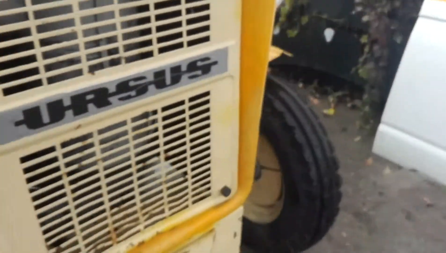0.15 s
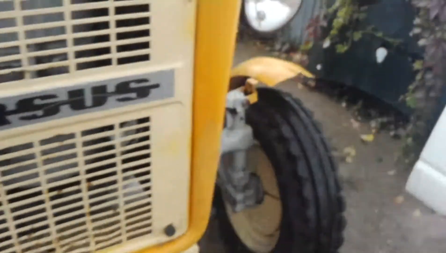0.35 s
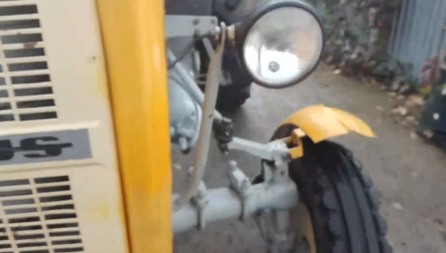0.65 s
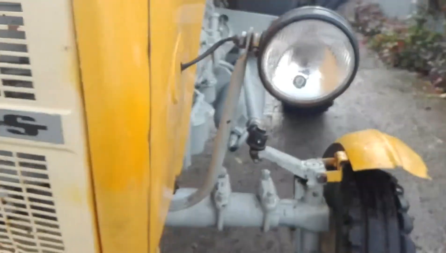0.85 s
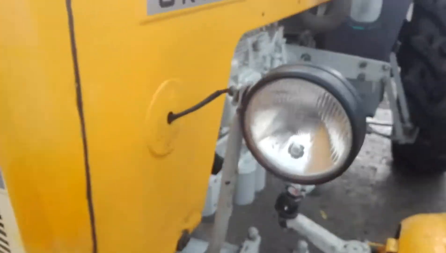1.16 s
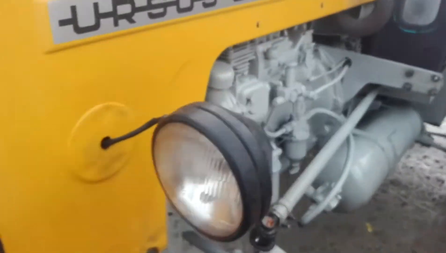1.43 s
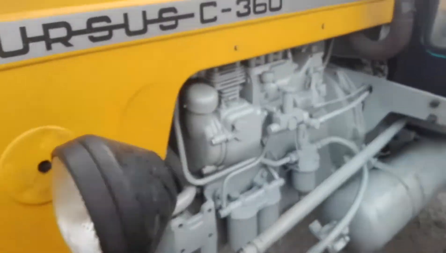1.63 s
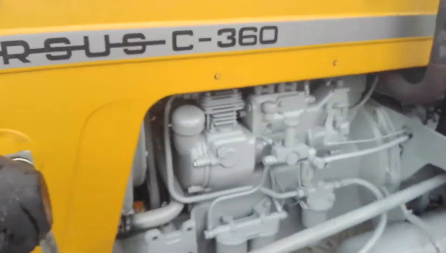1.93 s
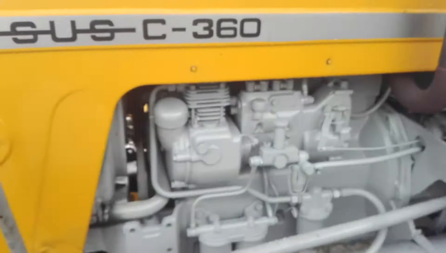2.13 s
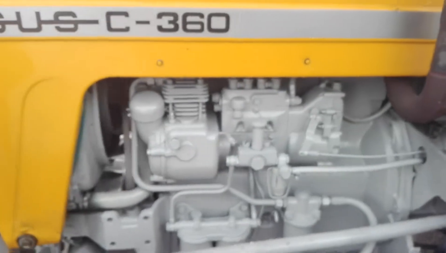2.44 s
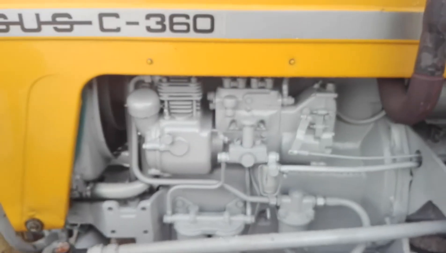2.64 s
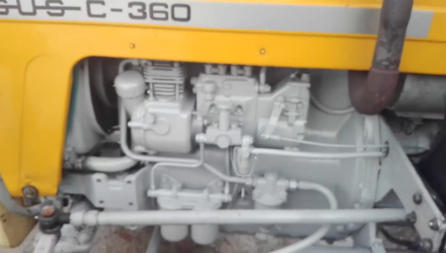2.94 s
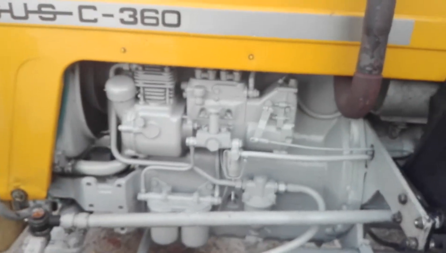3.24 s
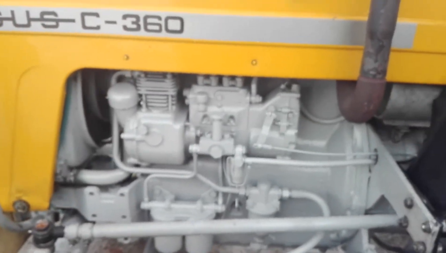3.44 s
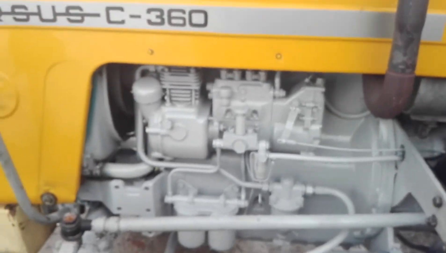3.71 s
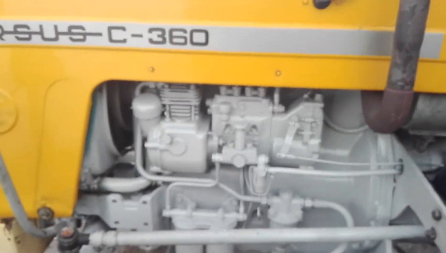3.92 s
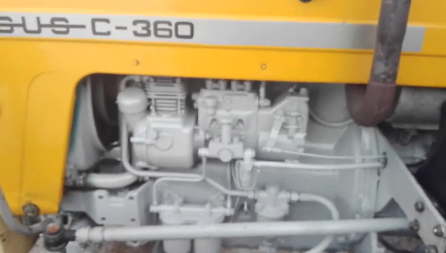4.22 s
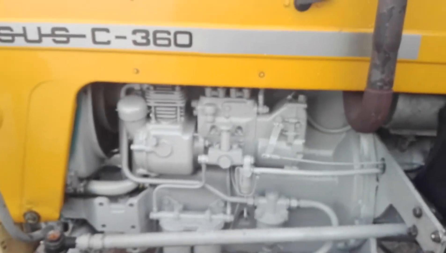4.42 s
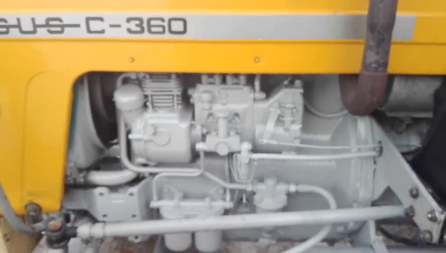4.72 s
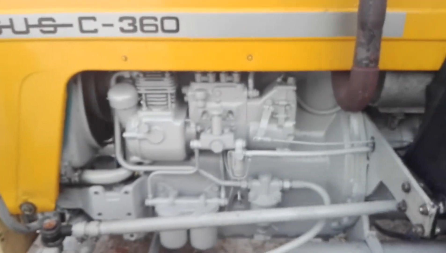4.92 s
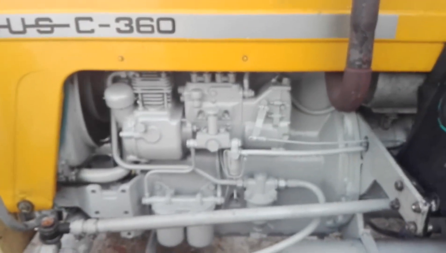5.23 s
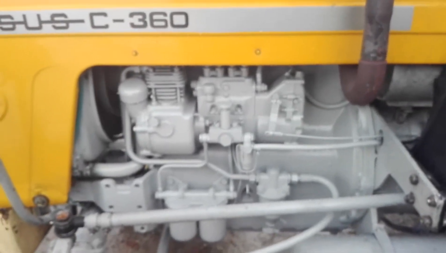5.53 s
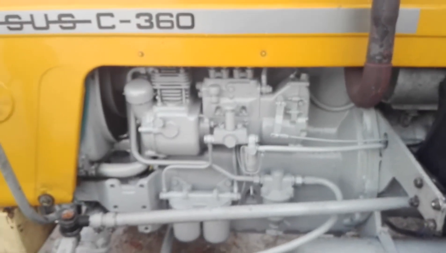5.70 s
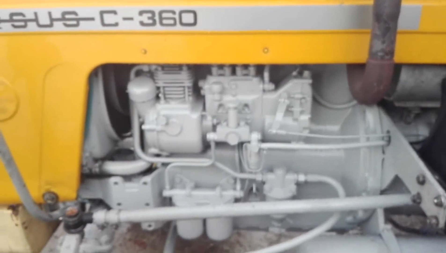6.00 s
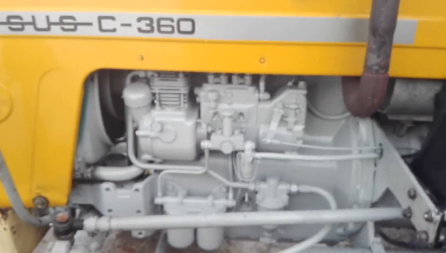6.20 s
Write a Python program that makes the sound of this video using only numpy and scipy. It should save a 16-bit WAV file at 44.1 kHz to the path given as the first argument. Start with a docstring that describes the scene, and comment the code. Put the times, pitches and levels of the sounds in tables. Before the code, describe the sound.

A four-cylinder tractor diesel is already idling at 0 s, close to the microphone in an open yard. About 27 firings a second blend into a low drone with rapid knocking, and unequal cylinders give a loping beat. At first the knock is boxy, heard through the grille. From about 1 to 2.75 s the microphone moves round to the side, and the metallic clatter, valve rattle and thin injector ticks become clearer and harder, with a soft intake gulp every cycle. The idle holds steady until 5.35 s. Then the throttle is blipped: a sudden loud bark and harsher, more even knocking, with a second push at about 5.7 s driving the pitch rapidly upward to a peak near 6 s, with a faint fan hum. Fuel cuts, the knocking drops sharply, and a smoother whirring engine coasts slowly downward until the end, around 6.4 s.

```python
"""Tractor diesel idling in a yard, then revved

The microphone moves from the grille of a four-cylinder tractor diesel round to its side.
Every firing thumps the pipe with low tones and knocks the block with bursts of coloured, ringing noise;
unequal cylinders give a low, loping beat. Near the end the throttle is blipped in two quick surges,
then the fuel cuts and the engine coasts smoothly."""
import sys
import numpy as np
from scipy import signal
from scipy.fft import rfft, irfft, next_fast_len
from scipy.io import wavfile
from scipy.ndimage import uniform_filter1d

SR = 44100
rng = np.random.default_rng(int(sys.argv[2]) if len(sys.argv) > 2 else 0)


def wav_record(signal):
    """Record a signal, one row per channel, as 16-bit PCM in the file named by sys.argv[1]."""
    frames = np.transpose(np.atleast_2d(signal))
    bounded = np.clip(frames, -1, 1)
    # unit amplitude maps onto the largest positive 16-bit level
    quanta = np.round(bounded * 32767).astype(np.int16)
    wavfile.write(sys.argv[1], SR, quanta)


N = 280476
TIME = np.arange(N) / SR  # seconds
TOP_HZ = 14400  # band limit of the recorder

# Microphone position. Each row: time in seconds, place from 0 (at the grille) to 1 (beside the block).
MIC_PLACE = [(.9, 0.054), (1.9, 0.48), (2.75, 1)]
# Cylinders in firing order, as uneven as they can be; evenness scales these down.
# Each row: boom in dB, knock in dB, clatter in dB, tick in dB.
CYLINDER_STRENGTHS = [(-11, -4, 3, 5), (-8.5, -1, 5, 3), (-1, -5, 0, -0.5), (-3.5, -4.5, 3, 4)]
# Engine speed. Each row: time in seconds, firings per second.
ENGINE_SPEED = [(0, 26.72), (1.7, 27.144), (2.7, 26.826), (5.36, 27.09), (5.53, 31.03), (5.63, 35.69),
                (5.72, 37.9), (6.0, 49.03), (6.37, 41.53)]
# Blips of the throttle. Each row: opens in seconds, shuts in seconds, fuel from 0 to 1.
THROTTLE_BLIPS = [(5.351, 5.698, 0.81), (5.674, 5.966, 0.93)]
# Each blip bites at once with a share of its fuel, swells to all of it and shuts quickly.
BITE_S, BITE_SHARE, SWELL_S, SHUT_S = 0.027, 0.47, 0.26, 0.056


def exhaust():
    """The pipe's loping idle drone becomes a hard bark at the first blip; bonnet boom and intake chug join it."""
    # Drone heard at the grille. Each row: multiple of the four-stroke cycle rate, level in dB.
    grille_orders = [(1, -48), (3, -46.5), (4, -21.5), (5, -37), (6, -33), (7, -33.5), (8, -15.5), (9, -38),
                     (10, -46), (11, -35.5), (12, -28.5), (13, -46.5), (14, -53), (22, -47), (24, -28.5),
                     (25, -58), (31, -53), (34, -40), (35, -51.5)]
    # Drone heard beside the block. Each row: multiple of the four-stroke cycle rate, level in dB.
    side_orders = [(1, -43), (3, -39), (4, -61), (5, -49.5), (6, -21), (7, -31), (8, -24), (9, -47.5),
                   (10, -27.5), (11, -42), (12, -26.5), (13, -24), (14, -32), (16, -49), (19, -37.5),
                   (20, -55), (21, -35)]
    # Resonances of the pipe under load. Each row: centre in Hz, width in Hz, level in dB.
    pipe_modes = [(41.6, 38, 11.5), (97, 83, -7.5), (255, 60, -17.5), (138, 27, -5.5)]
    # Resonances of silencer and bonnet. Each row: centre in Hz, width in Hz, level in dB.
    bonnet_modes = [(120.4, 8.4, 0.5), (144.4, 16.2, 0.5), (169.3, 18.6, -0.5), (198, 29.4, -6),
                    (238.7, 27, -9.5), (322, 17, -13.5)]
    # Air through the radiator. Each row: frequency in Hz, level in dB per Hz.
    draught = [(100, -43), (200, -1), (310, -2), (430, -9.5), (560, -11.5), (900, -43.5)]
    # Thrum level: idling at the grille, idling beside the block, at full fuel, starting to coast, all in dB.
    thrum_states = (-16.5, -19.5, -10.5, -33)
    # Boom level in dB, in the same four states.
    boom_states = (-32.5, -29.5, -19, -29.5)
    thrum_return = 13  # dB per second: the exhaust picks up again as the coasting engine slows

    cylinder_db = np.transpose(CYLINDER_STRENGTHS)[0]
    even, place = evenness(), track(MIC_PLACE)

    grille_drone = drone(grille_orders, lag=0.018)
    side_drone = drone(side_orders, lag=0.078)
    idle = blend(grille_drone, side_drone, place)
    pipe_puffs = puffs(cylinder_db, scatter_db=3.0, jitter=0.0009)
    bark = -band(resonate(pipe_puffs, pipe_modes), 32.6, 204)
    thrum = steady(blend(idle, steady(bark), even))

    bonnet_puffs = puffs(cylinder_db, scatter_db=4.0, jitter=0.0001)
    boom = steady(band(resonate(bonnet_puffs, bonnet_modes), 116.5, 287))
    # the gulps stand out beside the block at idle
    boom = blend(boom, chug(), 0.5 * place * (1 - even))
    air = steady(coloured(rng.standard_normal(N), draught))
    boom = steady(blend(boom, air, 0.12))

    coasted_s = np.maximum(TIME - THROTTLE_BLIPS[-1][1], 0)
    thrum_db = by_state(thrum_states, shade=0.13) + thrum_return * coasted_s
    return amp(thrum_db) * thrum + amp(by_state(boom_states, shade=0.3)) * boom


def drone(orders, lag, size=512):
    """Clean low orders locked to the crank; the beat starts lag firings into each cycle."""
    order, db = np.transpose(orders)
    multiples = np.arange(size // 2 + 1)
    order_db = np.interp(multiples, np.round(order), db)
    order_db = order_db - 8.3 * np.maximum(multiples - order[-1], 0)  # falls away above the last order
    cycle = irfft(causal(amp(order_db)))
    turn = (crank() - lag) / len(CYLINDER_STRENGTHS)
    return steady(np.interp(turn, np.arange(size) / size, cycle, period=1))


def chug(centre=2.05, length=0.66, start_hz=232, end_hz=150):
    """Once a cycle the air intake gulps: a swelling tone that falls in pitch (centre and length in firings)."""
    turn = crank() % len(CYLINDER_STRENGTHS) - centre
    rate = track(ENGINE_SPEED).mean()
    fall = (end_hz - start_hz) / (4 * length)
    cycles = ((start_hz + end_hz) / 2 * turn + fall * turn ** 2 / 2) / rate
    swell = np.exp(-(turn / length) ** 2 / 2)
    return steady(swell * np.sin(2 * np.pi * cycles))


def combustion():
    """Diesel knock rings the block, heard through the grille, then in the open; its colour shifts at the blips."""
    # Knock through the grille. Each row: frequency in Hz, level in dB per Hz.
    front_colour = [(160, -29.5), (280, -1.5), (324, 5), (428, -13.5), (544, -9), (641, -5), (934, -10.5),
                    (1010, -3.5), (1370, -11.5), (1680, -11.5), (1870, -8.5), (2800, -10.5), (3640, -21),
                    (6160, -120)]
    # Knock in the open beside the block. Each row: frequency in Hz, level in dB per Hz.
    block_colour = [(310, -40.5), (520, -8.5), (774, 0.5), (850, -1.5), (1210, 4.5), (1560, 2.5),
                    (1680, -4), (1830, 4), (2040, -2), (2410, -15), (2600, -27), (3380, -34), (5720, -120)]
    # Knock from the first blip on. Each row: frequency in Hz, level in dB per Hz.
    loaded_colour = [(310, -35.5), (520, -34), (595, -17.5), (728, -3), (916, -12), (1050, -4), (1140, -6),
                     (1210, -6), (1310, -5), (1570, 0), (2010, -8), (2140, -11.5), (2600, -30), (3380, -24),
                     (5720, -120)]
    # Ringing of the block. Each row: centre in Hz, width in Hz, level in dB.
    block_modes = [(758, 100, -3.5), (1107, 17, 8.5), (1241, 24, 1.5), (1553, 29, 2.5), (1792, 81, -0.5),
                   (2040, 69, -1)]
    # Knock level: idling at the grille, idling beside the block, at full fuel, coasting, all in dB.
    knock_states = (-30, -27.5, -15, -31.5)
    hits = blows(np.transpose(CYLINDER_STRENGTHS)[1], lead=0.0004, rise=0.0012, t60=0.14, alike=0.72,
                 scatter_db=0.44, crack=0.44, crack_t60=0.0051, rattle=0.019, whirr=0.96)
    front = steady(coloured(hits, front_colour))
    beside = steady(coloured(hits, block_colour))
    idle = steady(blend(front, beside, track(MIC_PLACE)))
    loaded = steady(coloured(hits, loaded_colour))
    body = steady(blend(idle, loaded, evenness()))
    return amp(by_state(knock_states, shade=10.5)) * with_ring(body, hits, block_modes, 0.072)


def valve_gear():
    """Tappets and rockers clatter with each firing and ping their cover."""
    # Clatter of the valves. Each row: frequency in Hz, level in dB per Hz.
    valve_colour = [(1290, -13), (2200, -6), (2510, -4.5), (4230, 0), (6020, -8.5), (7000, -23),
                    (9100, -34), (15400, -120)]
    # Ringing of the rocker cover. Each row: centre in Hz, width in Hz, level in dB.
    cover_modes = [(3270, 50, 16), (4090, 55, -10), (4650, 68, 2), (4900, 160, 10), (5750, 28, -9)]
    # Clatter level: idling at the grille, idling beside the block, at full fuel, coasting, all in dB.
    clatter_states = (-36.5, -32.5, -22.5, -36.5)
    hits = blows(np.transpose(CYLINDER_STRENGTHS)[2], lead=0.0017, rise=0.0041, t60=0.099, alike=0.45,
                 scatter_db=1.1, crack=0.18, crack_t60=0.04, rattle=0.028, whirr=0.84)
    body = steady(coloured(hits, valve_colour))
    return amp(by_state(clatter_states, shade=1.7)) * with_ring(body, hits, cover_modes, 0.024)


def injection():
    """Pump and injector needles tick just ahead of the knock and ring the fuel lines."""
    # Tick of the injectors. Each row: frequency in Hz, level in dB per Hz.
    injector_colour = [(3650, -16.5), (6200, -8), (6800, -3), (8630, -7), (10200, -12), (12400, -13.5),
                       (13700, -13.5), (14500, -29)]
    # Ringing of the fuel lines. Each row: centre in Hz, width in Hz, level in dB.
    line_modes = [(6430, 25, 4), (8700, 56, 8), (9500, 83, 6.5), (10500, 120, 4), (11990, 100, -7)]
    # Tick level: idling at the grille, idling beside the block, at full fuel, coasting, all in dB.
    tick_states = (-48, -45, -31, -48)
    hits = blows(np.transpose(CYLINDER_STRENGTHS)[3], lead=0.005, rise=0.012, t60=0.081, alike=0.68,
                 scatter_db=3.6, crack=0.52, crack_t60=0.0045, rattle=0.02, whirr=1.0)
    body = steady(coloured(hits, injector_colour))
    return amp(by_state(tick_states, shade=1.4)) * with_ring(body, hits, line_modes, 0.088)


def loose_tappet(index=2, lag=0.0023, t60=0.025, low_hz=5200, high_hz=9500):
    """One cylinder's loose tappet adds a short bright click to every cycle, lag seconds after firing."""
    # Click level: idling at the grille, idling beside the block, at full fuel, coasting, all in dB.
    tappet_states = (-45, -46, -31, -66)
    no_bias = np.zeros(len(CYLINDER_STRENGTHS))
    at, cylinder, strength = firings(no_bias, scatter_db=3.5, jitter=0.0006)
    strikes = np.bincount(at + int(lag * SR), strength * (cylinder == index), N)[:N]
    decay = amp(-60 * TIME[:SR // 10] / t60)
    envelope = signal.fftconvolve(strikes, decay)[:N]
    click = steady(band(rng.standard_normal((2, N)), low_hz, high_hz))
    return amp(by_state(tappet_states)) * envelope * click


def top_hum(multiple=4.1, top_db=-28.5, db_per_octave=50):
    """The engine hums at a fixed multiple of the firing rate, heard only near top speed."""
    speed = track(ENGINE_SPEED)
    level_db = top_db + db_per_octave * np.log2(speed / speed.max())
    return amp(level_db) * np.sqrt(2) * np.sin(2 * np.pi * multiple * crank())


def blows(cylinder_db, lead, rise, t60, alike, scatter_db, crack, crack_t60, rattle, whirr, count=4):
    """Mid and side noise of metal struck once per firing, over the even whirr of gears and fan (times in s)."""
    # Share of the noise in blows: idling at the grille, idling beside the block, at full fuel, coasting (0-1).
    blow_share = (0.69, 0.81, 1, 0.41)
    t = np.arange(5400) / SR
    even, share = evenness(), by_state(blow_share)
    cylinders = len(CYLINDER_STRENGTHS)
    # each cylinder shakes the block in its own way, much the same every time
    own = rng.standard_normal((cylinders, 2, len(t)))
    # loose parts strike again at nearly fixed delays after the blow
    delays = rng.uniform(0.77, 1, (cylinders, count)) * np.linspace(0.2, 1, count) * rattle
    out = np.zeros((2, N + SR))
    for at, cylinder, strength in zip(*firings(cylinder_db, scatter_db, jitter=0.0003)):
        haste = 1 + 0.48 * even[at]  # from the first blip on: a shorter blow with a faster rise
        shape = (1 - np.exp(-haste * t / rise)) * amp(-60 * haste * t / t60)
        strike_delays = delays[cylinder] + rng.uniform(0, 0.002, count)
        for delay, db in zip(strike_delays, rng.normal(0, 3.2, count)):
            crack_gain = crack * amp(db - 60 * delay / t60)
            shape = shape + crack_gain * (t > delay) * amp(-60 * np.abs(t - delay) / crack_t60)
        fresh = rng.standard_normal((2, len(t)))
        grain = tinted(blend(fresh, own[cylinder], alike), depth_db=2.4)
        start = max(at - int(lead * SR), 0)
        out[:, start:][:, :len(t)] += strength * shape * grain
    even_noise = rng.standard_normal((2, N))
    return blend(even_noise, steady(out[:, :N]), 1 - whirr * (1 - share))


def tinted(x, depth_db, count=28):
    """x with a new random colour, as no two blows land alike."""
    hz = np.fft.rfftfreq(x.shape[-1], 1 / SR)
    points = np.column_stack([np.geomspace(500, TOP_HZ, count), depth_db * rng.standard_normal(count)])
    return irfft(rfft(x) * along(points, hz), x.shape[-1])


def with_ring(body, hits, modes, share):
    """Adds a share of ringing metal to the body of a sound."""
    # mid and side change places, so the ring has its own noise
    ring = steady(resonate(hits[::-1], modes))
    return steady(blend(body, ring, share))


def firings(cylinder_db, scatter_db, jitter):
    """Sample, cylinder and strength of each firing, with timing jitter in seconds; evenness levels the cylinders."""
    turns = crank()
    n = np.arange(int(turns[-1]) + 1)
    chance = rng.standard_normal((len(n), 2))
    fired_s = np.interp(n, turns, TIME) + jitter * chance[:, 0]
    at = np.clip(fired_s * SR, 0, N - 1).astype(int)
    cylinder = n % len(CYLINDER_STRENGTHS)
    uneven = 1 - evenness()[at]
    return at, cylinder, amp(uneven * cylinder_db[cylinder] + scatter_db * chance[:, 1])


def puffs(cylinder_db, scatter_db, jitter):
    """One pressure pulse per firing."""
    at, _, strength = firings(cylinder_db, scatter_db, jitter)
    return np.bincount(at, strength, N)


def crank(first_firing_s=0.023):
    """Crank progress, counted in firings: the running sum of engine speed."""
    turns = np.cumsum(track(ENGINE_SPEED)) / SR
    return turns - turns[int(first_firing_s * SR)]


def fuel():
    """Fuel above idle, 0 to 1: every blip bites, swells and shuts."""
    pushes = []
    for opens, shuts, amount in THROTTLE_BLIPS:
        swell = BITE_SHARE + (1 - BITE_SHARE) * ramp(opens, SWELL_S)
        pushes.append(amount * ramp(opens, BITE_S) * swell * (1 - ramp(shuts, SHUT_S)))
    return np.max(pushes, axis=0)


def evenness(idle=0.19):
    """How alike the cylinders fire (0-1): from the first blip on, the engine stops loping and all work alike."""
    return idle + (1 - idle) * ramp(THROTTLE_BLIPS[0][0], BITE_S)


def by_state(values, shade=1):
    """Moves between grille, side, full-fuel and coasting values; more shade brings a part into the open later."""
    grille, side, loaded, coast = values
    in_view = track(MIC_PLACE) ** shade
    coasting = ramp(THROTTLE_BLIPS[-1][1], SHUT_S)
    return grille + (side - grille) * in_view + (loaded - side) * fuel() + (coast - side) * coasting


def ramp(start, length):
    """Rises from 0 to 1 over length seconds."""
    return np.clip((TIME - start) / length, 0, 1)


def track(rows):
    """One value per sample from (seconds, value) rows."""
    seconds, values = np.transpose(rows)
    return np.interp(TIME, seconds, values)


def amp(db):
    """Decibels to gain."""
    return 10 ** (np.asarray(db) / 20)


def steady(x):
    """x levelled to about rms 1 over an idling engine cycle, keeping the beats within it; mid sets the gain."""
    size = int(0.148 * SR)
    mid_power = np.atleast_2d(x)[0] ** 2
    power = uniform_filter1d(uniform_filter1d(mid_power, size), size // 2)
    return x / np.sqrt(np.abs(power) + 1e-12)


def blend(a, b, share):
    """Equal-power fade from a to b."""
    share = np.clip(share, 0, 1)
    return np.sqrt(1 - share) * a + np.sqrt(share) * b


def along(points, hz):
    """Gain of (Hz, dB) points on a log axis."""
    f, db = np.transpose(points)
    return amp(np.interp(np.log(hz + 1), np.log(f + 1), db))


def causal(gain):
    """The minimum-phase response that has these gains, by folding the cepstrum."""
    cepstrum = irfft(np.log(np.maximum(gain, 1e-6)))
    half = len(cepstrum) // 2
    cepstrum[1:half] *= 2
    cepstrum[half + 1:] = 0
    return np.exp(rfft(cepstrum))


def filtered(x, response):
    """x times a response of frequency, padded so that tails do not wrap."""
    m = 2 * next_fast_len(N // 2 + 8192)
    return irfft(rfft(x, m) * response(np.fft.rfftfreq(m, 1 / SR)), m)[..., :N]


def coloured(x, spectrum):
    """x through a causal body with this spectrum."""
    return filtered(x, lambda hz: causal(along(spectrum, hz)))


def resonate(x, modes):
    """x through a few parallel resonances of alternating sign."""
    def response(f):
        total = 0
        for k, (centre, width, db) in enumerate(modes):
            total = total + (-1) ** k * amp(db) * 1j * f * width / (centre * centre - f * f + 1j * f * width)
        return total
    return filtered(x, response)


def band(x, low_hz, high_hz, order=2):
    """Causal band-pass."""
    return signal.sosfilt(signal.butter(order, [low_hz, high_hz], "band", fs=SR, output="sos"), x)


def scene():
    """The whole engine in stereo; the channels differ almost only in the treble."""
    # Stereo width. Each row: frequency in Hz, side to mid gain in dB.
    stereo_width = [(2500, -60), (3800, -40), (4600, -15), (6000, -9), (9000, -6.5), (13000, -4.5)]
    mid, side = combustion() + valve_gear() + injection() + loose_tappet()
    mid = mid + exhaust() + top_hum()
    side = filtered(side, lambda hz: along(stereo_width, hz))
    return np.array([mid + side, mid - side])


def record(dry):
    """The recorder rounds off the highest peaks and keeps nothing above its band limit."""
    limited = dry / (1 + np.abs(dry) ** 8) ** (1 / 8)
    return filtered(limited, lambda hz: 1 / (1 + (hz / TOP_HZ) ** 160))


dry = scene()
out = record(dry)
wav_record(out)
```